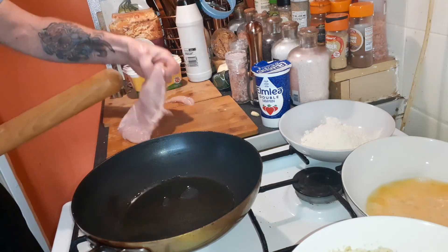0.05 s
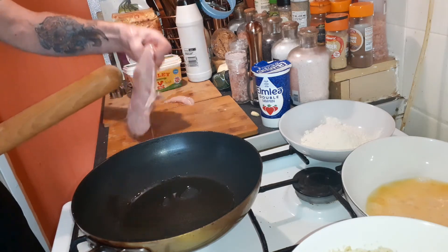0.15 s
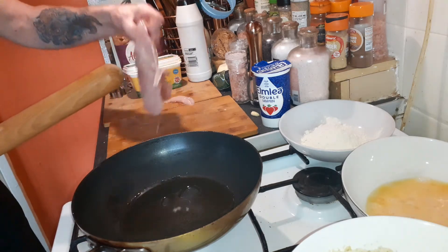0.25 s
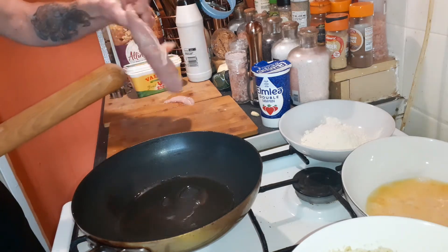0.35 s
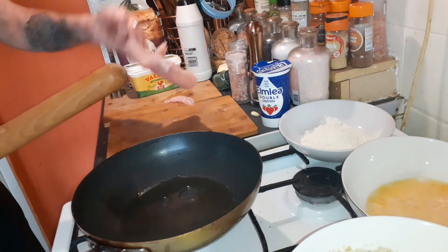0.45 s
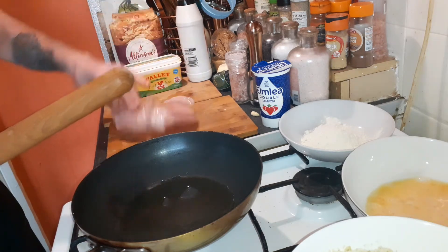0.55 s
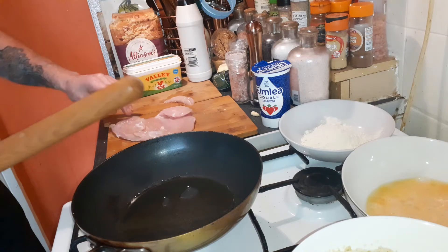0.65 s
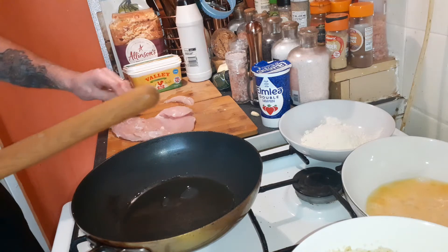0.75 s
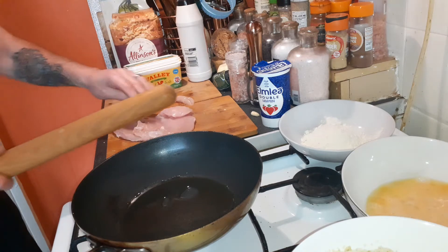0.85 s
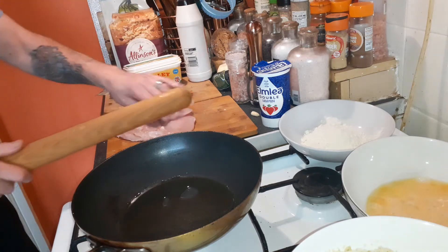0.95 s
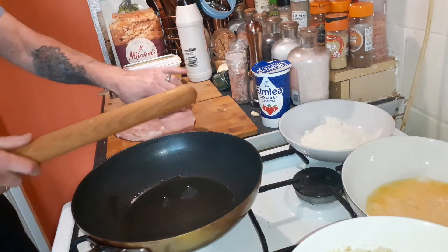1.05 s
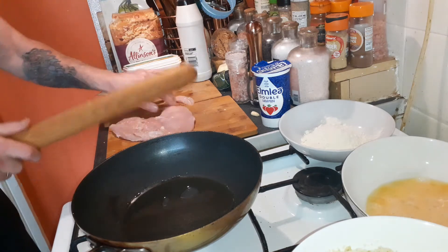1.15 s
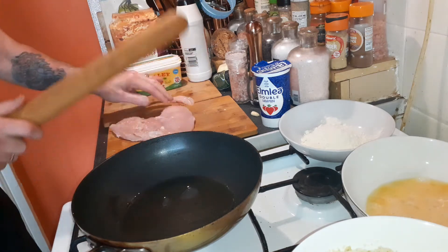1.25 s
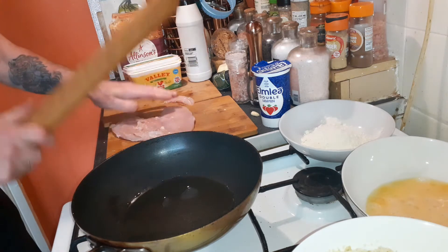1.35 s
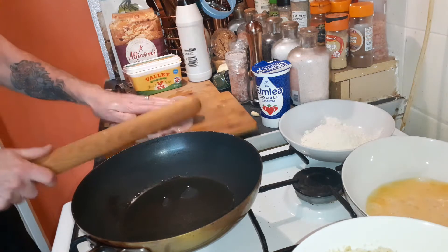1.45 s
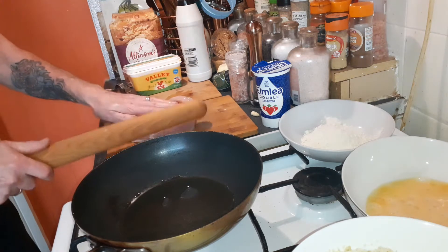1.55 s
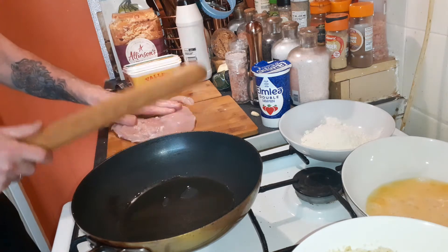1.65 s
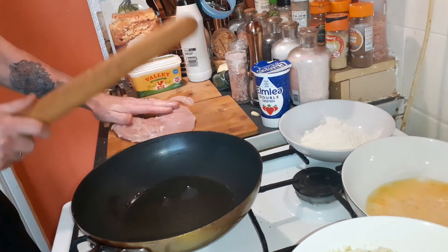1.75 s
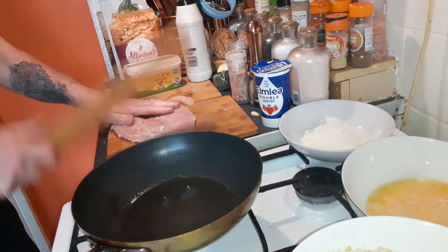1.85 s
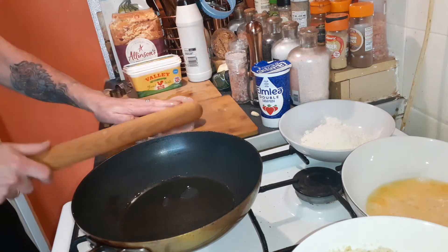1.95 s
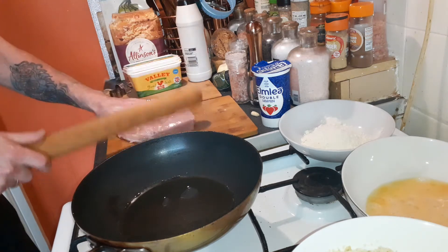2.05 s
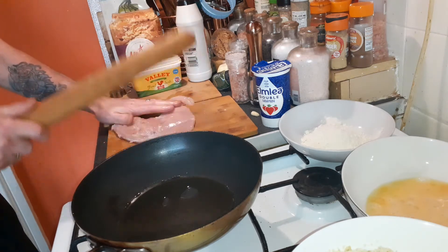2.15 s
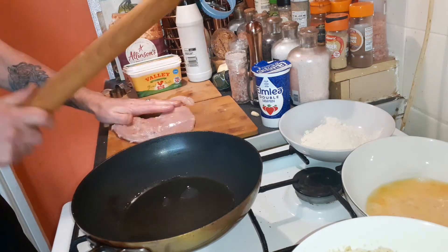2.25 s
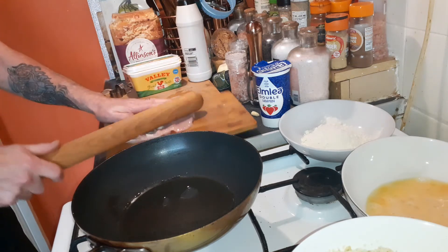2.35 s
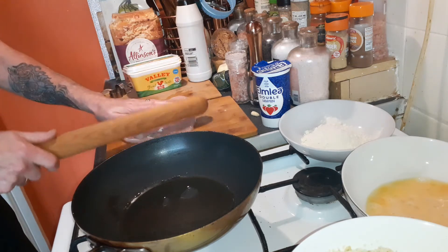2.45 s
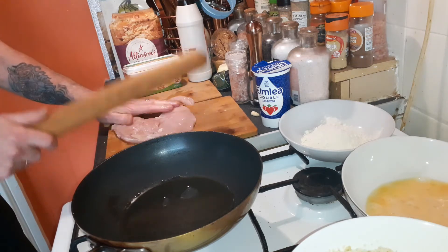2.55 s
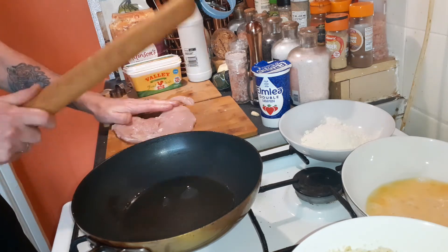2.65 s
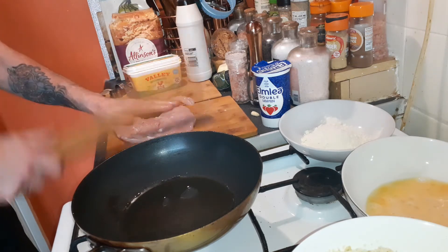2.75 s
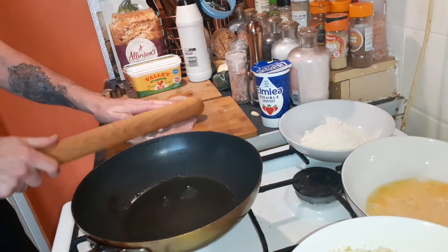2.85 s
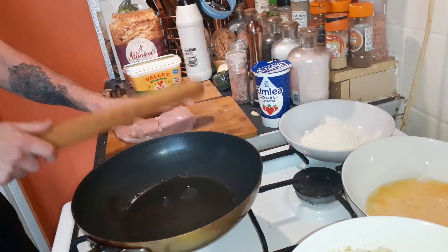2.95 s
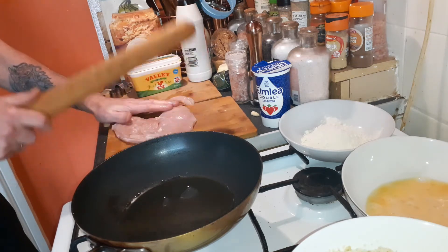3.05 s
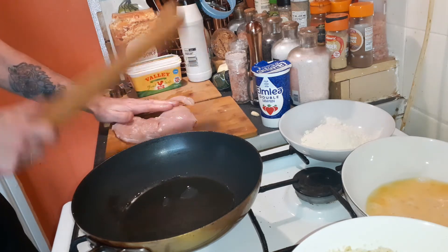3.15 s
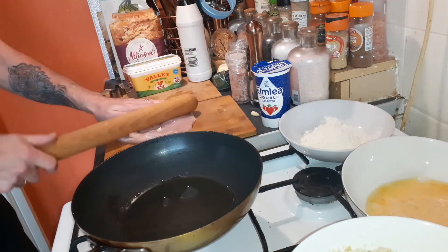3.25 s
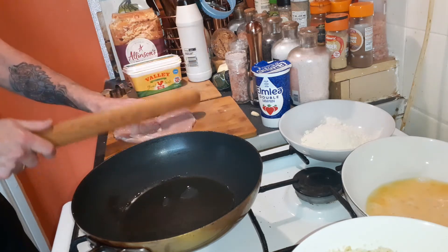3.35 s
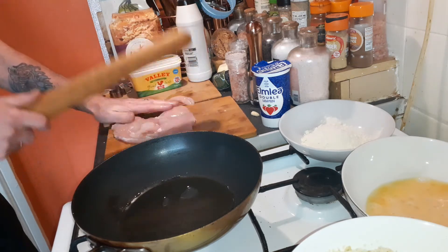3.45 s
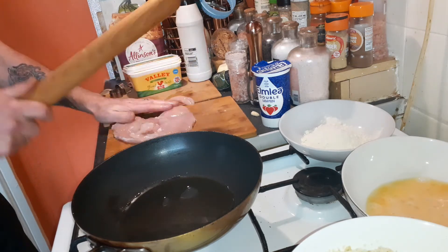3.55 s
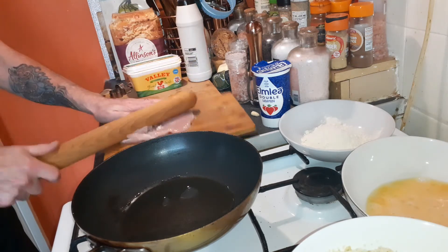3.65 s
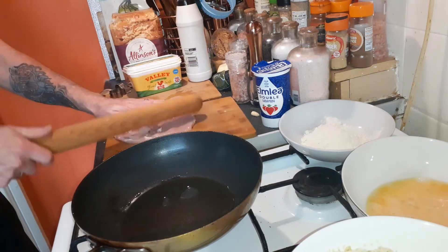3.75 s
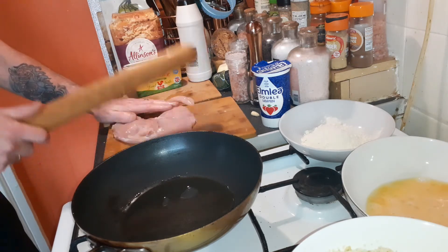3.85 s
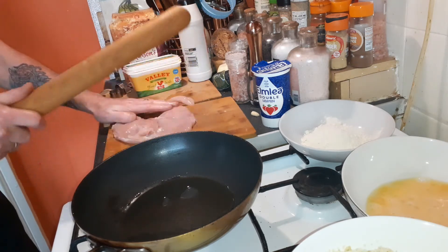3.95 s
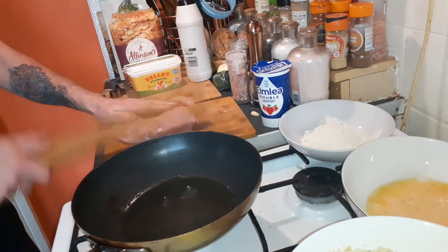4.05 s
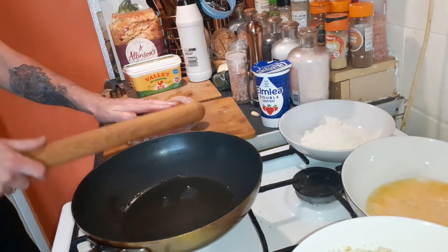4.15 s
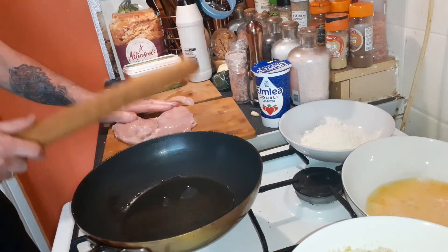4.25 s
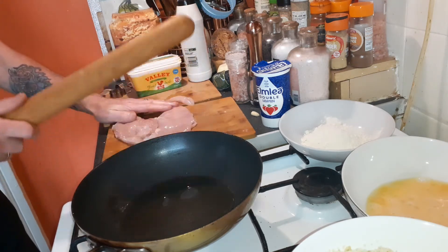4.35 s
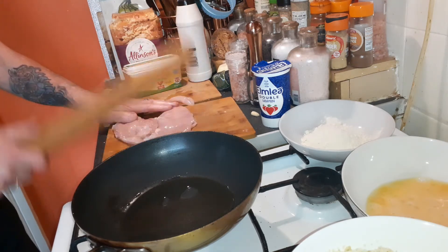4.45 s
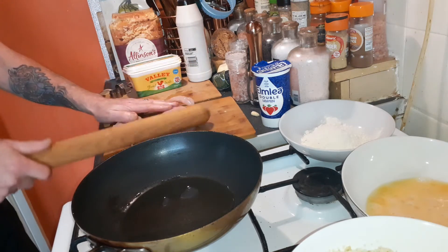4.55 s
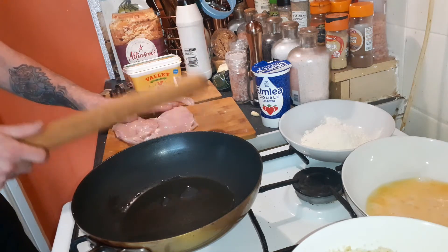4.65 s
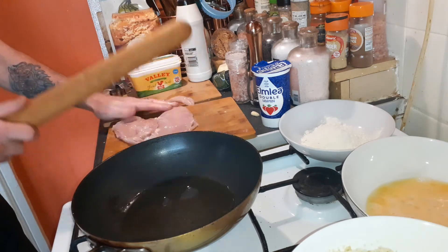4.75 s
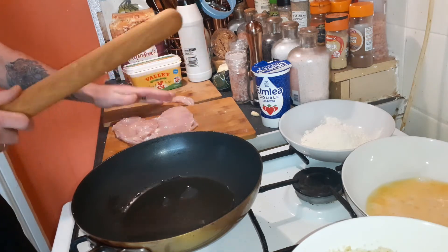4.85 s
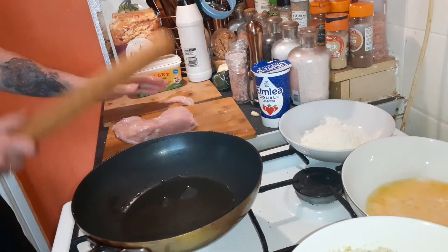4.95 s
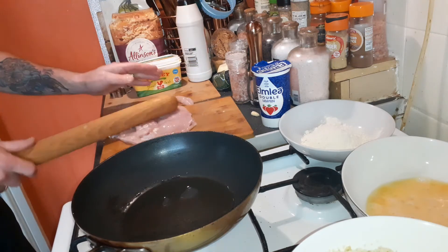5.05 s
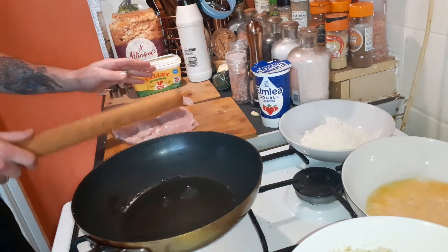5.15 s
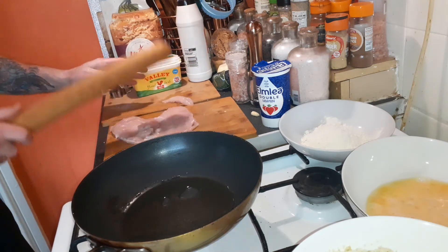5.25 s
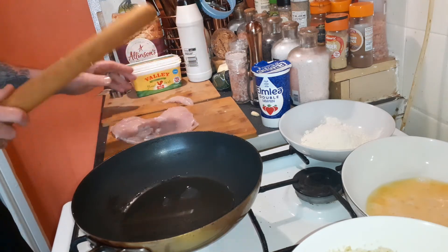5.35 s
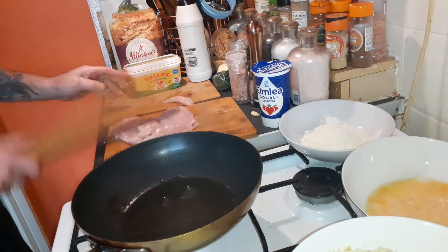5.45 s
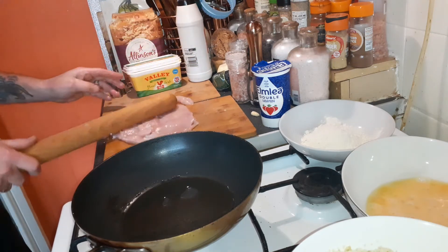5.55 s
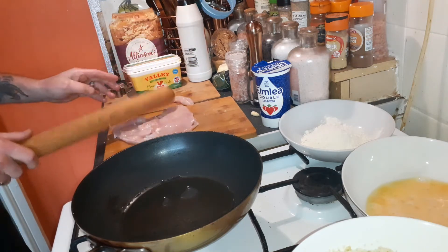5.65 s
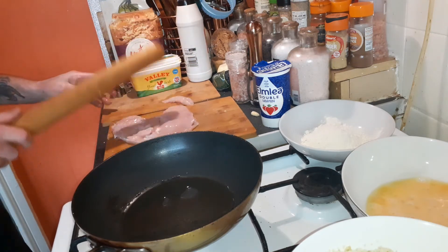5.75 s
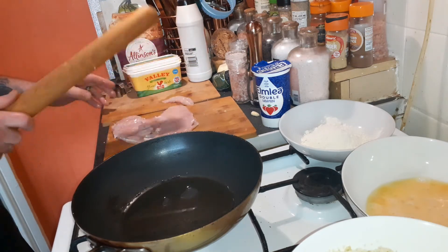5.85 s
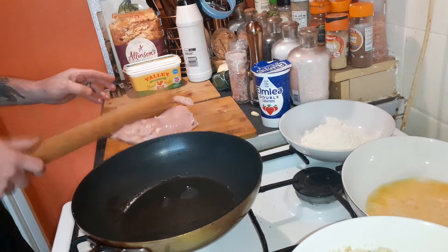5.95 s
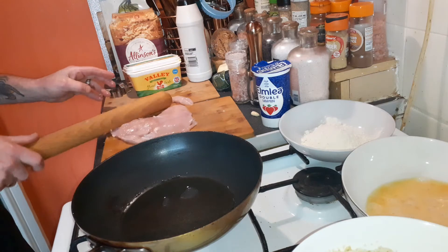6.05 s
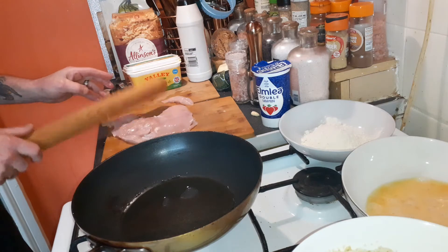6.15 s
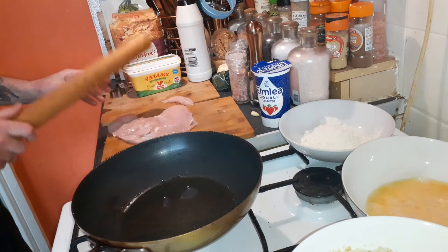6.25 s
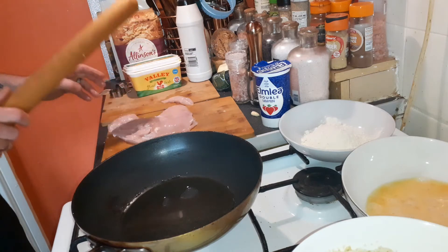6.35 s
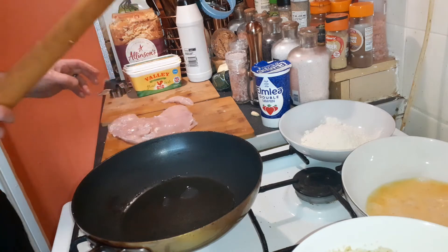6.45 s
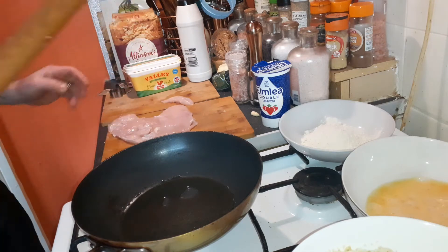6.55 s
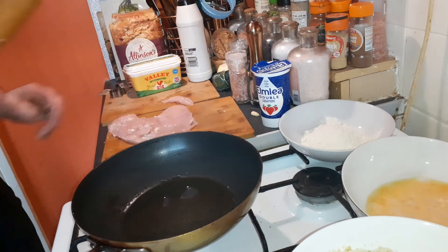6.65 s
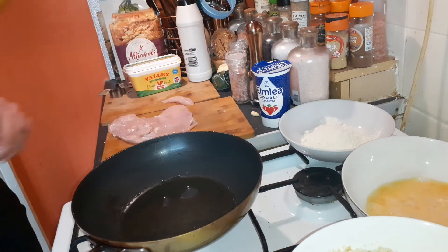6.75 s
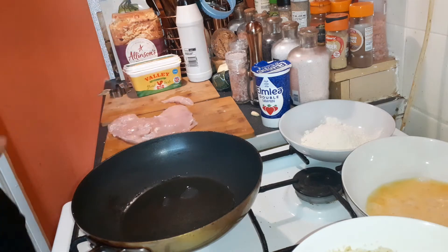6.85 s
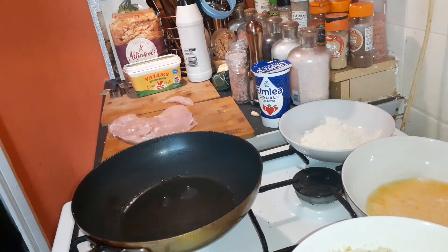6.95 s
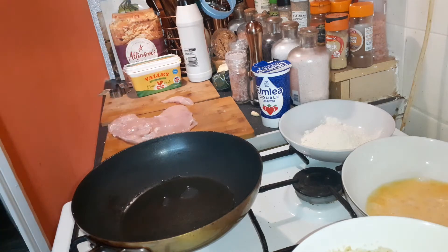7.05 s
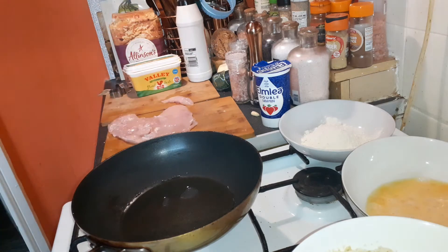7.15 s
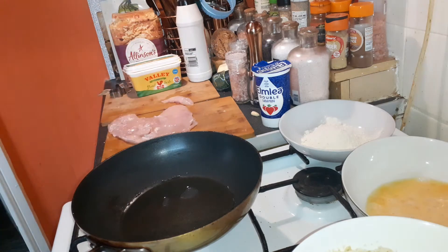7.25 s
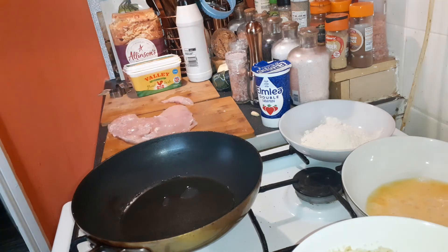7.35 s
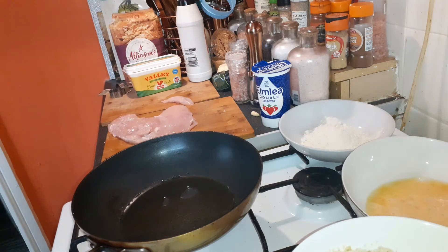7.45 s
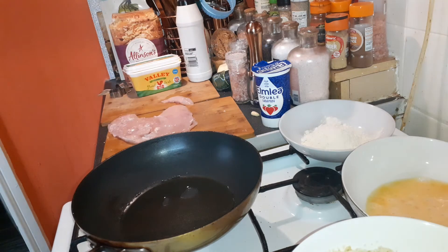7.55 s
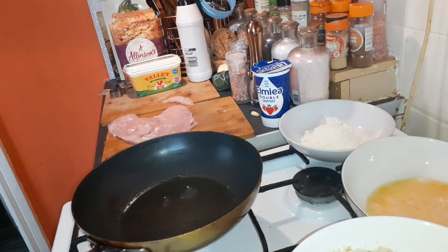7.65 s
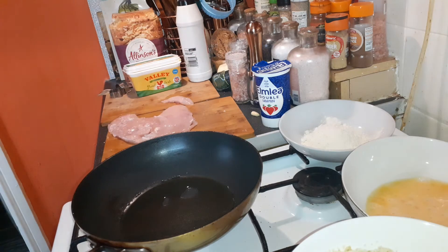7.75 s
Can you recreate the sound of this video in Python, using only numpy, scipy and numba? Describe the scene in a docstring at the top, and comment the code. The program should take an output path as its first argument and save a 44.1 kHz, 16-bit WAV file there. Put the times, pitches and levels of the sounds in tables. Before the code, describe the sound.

A chicken breast flops onto a wooden board, then a rolling pin pounds it eleven times with wet slaps, thuds and clatter.

```python
"""In a small, hard-walled kitchen, a chicken breast flops onto a wooden chopping board.
A rolling pin pounds it eleven times. Each blow squeezes out a wet slap and sends a thud through
board and worktop; the board hops and clatters back down. The cook shuffles softly, the room echoes,
an appliance hums under a faint hiss, and a phone's limiter flattens the loudest blows."""
import sys
import numpy as np
from scipy import signal
from scipy.fft import rfft, irfft
from scipy.io import wavfile
from numba import njit

SR = 44100
rng = np.random.default_rng(int(sys.argv[2]) if len(sys.argv) > 2 else 0)


def log_audio(samples):
    """Write samples as a 16-bit WAV file to the path given in sys.argv[1]."""
    # one column per channel
    frames = np.atleast_2d(samples).T
    # limit to full scale, then quantise
    limited = np.clip(frames, -1, 1)
    pcm = np.round(limited * 32767).astype(np.int16)
    wavfile.write(sys.argv[1], SR, pcm)


N = 343715
T = np.arange(N) / SR
SHORT_T = T[:int(SR * .6)]  # time axis for one short sound

# Levels in the tables are relative: the functions add their own gains.
# blows of the pin: t/s, force/dB, board ring on top of the force/dB, squash time/s,
# treble cutoff/Hz, board's time in the air/s, landing level/dB, rocking time/s
BLOWS = [(1.452, -8, 1.5, .0052, 9000, 0.057, -20.5, .016),
         (1.913, -5.5, 2, 0.0045, 10000, 0.051, -23.5, 0),
         (2.363, -5.5, -2.5, 0.0023, 14000, 0.055, -10, 0),
         (2.797, -5, -2.5, 0.0056, 13500, 0.051, -9.5, 0),
         (3.223, -5, -3, 0.0067, 13000, 0.052, -15, 0.00045),
         (3.665, -5, -8.5, 0.007, 13000, 0.063, -13, 0.001),
         (4.093, -8.5, -3, .007, 14000, 0.052, -11.5, 0.0025),
         (4.517, -7.5, -4.5, .006, 10000, .0535, -13.5, 0.0015),
         (5.023, -11.5, -9.5, 0.0047, 11500, 0.054, -14, 0.0069),
         (5.491, -5, 1.5, 0.0087, 7500, 0.077, -15.5, 0.039),
         (5.982, -7, -12, 0.0067, 5500, 0.044, -15.5, 0.018)]
# tone of the pin's dull knock: f/Hz, level/dB
KNOCK_TONE = [(100, -15.5), (250, 1), (400, 2.5), (900, -0.5), (1400, 0.5), (2000, -19), (4000, -25.5),
              (12000, -35.5)]
# tone of the wet slap: f/Hz, level/dB
SLAP_TONE = [(300, -11), (1000, -7), (2000, -1), (3900, -1), (4800, -5), (8900, -6.5), (10000, -13),
             (12500, -11), (16000, -11)]
# tone of the board landing: f/Hz, level/dB
CLACK_TONE = [(100, -8.5), (300, -10), (800, -2), (1300, -4.5), (2000, -6.5), (3800, -10), (6000, -14.5),
              (8900, -17.5), (10000, -24), (12500, -23.5), (16000, -33.5)]
# notes that board, worktop and cupboard ring at: f/Hz, level/dB, time to fade 60 dB/s, left minus right/dB
WOOD_NOTES = [(75, -19, .33, -3), (102, -11, .22, -5), (130, -15, .45, -3), (157, -12, .16, -4),
              (186, -6, .33, -5), (203, -13, .26, -6), (278, -4, .21, -2), (329, 1, .18, -5),
              (358, -3, .15, -4), (394, -6, .22, -1), (450, -9, .1, 0), (565, -8, .12, 2),
              (591, -3, .19, -7), (696, -4, .19, 3), (762, -7, .17, 1), (841, 1, .18, 3), (864, -2, .2, -7),
              (980, -6, .16, -5), (1033, -6, .2, 0), (1121, -6, .15, -2), (1223, -3, .2, 0),
              (1495, -11, .18, 0), (1666, -10, .2, 0), (2384, -10, .17, 0)]
# the cook's soft movements: t/s, level/dB, rise time/s, scuff compared with bump/dB
COOK_MOVES = [(1.097, -48, 0.0061, -6.5), (6.521, -57.5, .02, 6.5), (6.995, -63, 0.051, -21.5),
              (7.629, -52, .011, -6.5), (7.674, -57, 0.023, 6)]
# how long the kitchen echoes: f/Hz, time to fade 60 dB/s
ECHO_TIMES = [(100, 0.31), (400, 0.31), (1100, 0.28), (3000, 0.27), (8000, 0.26), (16000, 0.24)]
# tones of the mains hum: f/Hz, level/dB
HUM_TONES = [(50, -17.5), (100, -4), (150, -14), (200, -21.5)]
# tone of the broad hiss: f/Hz, level/dB
HISS_TONE = [(25, -23), (70, -12), (170, -14.5), (330, -12.5), (700, -18), (1300, -18.5), (2300, -37.5),
             (3900, -27), (5600, -29), (8900, -26.5), (12000, -20), (16000, -25)]
# narrow bands that stand out of the hiss: f/Hz, width/Hz, level/dB
HISS_PEAKS = [(1189, 9.8, -11), (1345, 150, -8.5), (3060, 62, -17), (3980, 67, -12), (4610, 430, -10),
              (6380, 180, -14), (8970, 100, -10)]
# loudness of hum and hiss together: t/s, level/dB
BACKGROUND_LEVEL = [(0.0, -68), (0.54, -68.5), (0.78, -62.5), (1.52, -60.5), (1.65, -67), (5.21, -68),
                    (6.99, -67.5), (7.79, -62)]

USUAL_SQUASH_S = .007  # a longer squash than this makes more slap, a shorter one less


def pounding(lead_s=.002, sink_s=.0023, bend_s=.00036, thud_s=.001):
    """Each hit squeezes juice and air from the meat, then loads the board. Gives (sound, force)."""
    knock, slap, bend, thud = np.zeros((4, N))
    for s, db, ring_db, squash_s, top_hz, wet_db in meat_contacts():
        squash = (SHORT_T / squash_s) ** 2 * np.exp(-2.6 * SHORT_T / squash_s)
        spray_gain = gain(db - 14 + wet_db) * np.sqrt(squash_s / USUAL_SQUASH_S)
        add(slap, s - lead_s, spray_gain * soften(crackle(squash, spread_db=11.5), top_hz))
        add(knock, s + sink_s, gain([db]))
        add(bend, s + sink_s, gain(db + ring_db) * push(bend_s))  # the quick part bends the board
        add(thud, s + sink_s, gain(db + 3.5) * push(thud_s))  # the slow part shakes the worktop
    sound = gain(34) * shape_tone(knock, KNOCK_TONE) + gain(43) * shape_tone(slap, SLAP_TONE)
    return sound, band(bend, 310, 1500) + thud


def meat_contacts(flop_s=.6083, flop_db=-23):
    """The breast flops down (tip, body, then the rest slumps), and the pin's blows follow."""
    # t/s, force/dB, board ring/dB, squash time/s, treble cutoff/Hz, extra wetness/dB
    tip = (flop_s - .016, flop_db - 18, 4, .011, 13000, 6.5)
    body = (flop_s, flop_db, 4, .0034, 13000, 6.5)
    slump = (flop_s + .032, flop_db - 16.5, 14.5, USUAL_SQUASH_S, 13000, 6.5)
    return [tip, body, slump] + [(*blow[:5], 0) for blow in BLOWS]


def clatter(contact_s=.00008, ticks_per_s=800, chatter_s=.032):
    """Bare wood lands with a crack, and loose things chatter to rest. Gives (sound, force)."""
    cracks, chatter = np.zeros((2, N))
    for s, crack_db, chatter_db, top_hz in board_touches():
        touches = rng.random(len(SHORT_T)) < ticks_per_s / SR
        ticks = crackle(touches * np.exp(-(SHORT_T / chatter_s) ** 2), spread_db=-1)
        add(chatter, s, gain(chatter_db) * soften(ticks, top_hz))
        add(cracks, s, gain(crack_db) * soften(signal.unit_impulse(len(SHORT_T)), top_hz))
    load = cracks + gain(-3) * chatter  # the chatter carries little weight
    force = band(convolve(load, push(contact_s))[0], 450, 4100)  # a light, hard touch favours high notes
    return gain(41) * shape_tone(cracks + chatter, CLACK_TONE), gain(-1) * force


def board_touches(flat_s=.003):
    """The board comes down after each hop. Gives rows of t/s, crack/dB, chatter/dB, treble cutoff/Hz."""
    for s, *_, top_hz, air_s, landing_db, rock_s in BLOWS:
        down_s, crack_hz = s + air_s, .96 * top_hz
        chatter_db = -15.5 + .18 * landing_db  # nearly as loud for a soft landing as for a hard one
        yield down_s, landing_db, chatter_db, crack_hz
        if rock_s > flat_s:  # crooked: one edge touches early, and a dull knock follows the landing
            yield down_s - rock_s, landing_db - 8.5, chatter_db - 3, crack_hz
            yield down_s + 2.5 * rock_s, landing_db - 9, chatter_db - 16.5, 2800


def wood_ring(build_s=.00075):
    """One tap sets board, worktop and cupboard ringing with many fading notes that start together."""
    ring = 0
    for k, (hz, db, fade_s, pan_db) in enumerate(WOOD_NOTES):
        # higher notes reach left and right further out of step
        phase_shift = (-1) ** (k // 2) * .69 * np.sqrt(min(hz / 600, 2)) * np.array([[1], [-1]])
        wave = np.sin(2 * np.pi * hz * SHORT_T + phase_shift)
        ring = ring + gain(db) * pan(pan_db) * wave * np.exp(-np.log(1000) * SHORT_T / fade_s)
    return ring * (1 - np.exp(-SHORT_T / build_s))


def shuffles():
    """The cook's small movements: each is a dull bump with a scuff on top."""
    track = np.zeros(N)
    for s, db, rise_s, scuff_db in COOK_MOVES:
        bump, scuff = rng.standard_normal((2, len(SHORT_T)))
        noise = unit(band(bump, 170, 650)) + gain(scuff_db) * unit(band(scuff, 800, 5200, order=1))
        add(track, s, gain(db) * noise * SHORT_T / rise_s * np.exp(1 - SHORT_T / rise_s))
    return track


def kitchen_echo(direct_db=-20, early_db=2, early_s=.0019, alike_hz=640):
    """The room's answer to a click: direct sound, quick echoes off tiles and jars, then a fading tail."""
    echo = np.zeros((2, len(SHORT_T)))
    early = gain(early_db) * np.exp(-SHORT_T / early_s)
    for hz in 70 * 2 ** (np.arange(17) / 2):  # half-octave bands
        middle, side = band(rng.standard_normal((2, len(SHORT_T))), hz / 2 ** .25, hz * 2 ** .25, order=3)
        # the bass is alike on the left and right
        noise = middle + side * np.array([[1], [-1]]) / np.sqrt(1 + (alike_hz / hz) ** 4)
        late = np.exp(-np.log(1000) * SHORT_T / lookup(ECHO_TIMES, hz))
        tail = noise * (late + early)
        band_energy = hz / np.sqrt(2) / SR
        echo += tail * np.sqrt(band_energy / np.sum(tail ** 2, axis=1, keepdims=True))
    echo[:, 0] += gain(direct_db)
    return echo * pan(-1.74)


def in_kitchen(x):
    """Arm and pin shift between blows, so each blow gets its own pattern of echoes."""
    out = np.zeros((2, N))
    edges = [0] + [int((blow[0] - .05) * SR) for blow in BLOWS] + [N]
    for start, end in zip(edges, edges[1:]):
        for track, echo in zip(out, convolve(x[:, start:end], kitchen_echo())):
            add(track, start / SR, echo)
    return out


def hum_and_hiss(waver_db=1, flicker_db=2):
    """An appliance's wavering mains hum and a hiss with flickering bands swell and sink together."""
    hiss = gain(3) * unit(shape_tone(rng.standard_normal((2, N)), HISS_TONE))
    for hz, width, db in HISS_PEAKS:
        noise = unit(band(rng.standard_normal((2, N)), hz - width / 2, hz + width / 2, order=1))
        hiss += gain(db + 5 + flicker_db * drift(per_s=4.9)) * noise
    hum = sum(gain(db) * unit(np.sin(2 * np.pi * (hz * T + rng.random()))) for hz, db in HUM_TONES)
    hum = hum * gain(4 + waver_db * drift(per_s=5)) * pan(-8.5)
    level_db = np.interp(T, *np.transpose(BACKGROUND_LEVEL))
    return (hiss + hum) * gain(level_db)


def push(rise_s):
    """A smooth push that peaks after rise_s and adds up to one."""
    force = SHORT_T * np.exp(-SHORT_T / rise_s)
    return force / force.sum()


def crackle(outline, spread_db):
    """Clicks of uneven size that follow a loudness outline, with a total energy of one."""
    x = rng.standard_normal(len(SHORT_T)) * gain(spread_db * rng.standard_normal(len(SHORT_T))) * outline
    return x / np.sqrt(np.sum(x ** 2))


def drift(per_s):
    """A slow random wander, roughly between -1 and 1."""
    steps = rng.standard_normal(400)
    return np.interp(T * per_s, np.arange(len(steps)), steps)


def gain(db):
    """Turn decibels into a number to multiply by."""
    return 10 ** (np.asarray(db) / 20)


def unit(x):
    """Scale a sound to an average (rms) level of one."""
    return x / np.sqrt(np.mean(x ** 2))


def pan(db):
    """Left and right gains, with the left louder by db."""
    return gain(np.array([[db], [-db]]) / 2)


def add(track, s, x):
    """Mix a short sound into a track at time s."""
    i = int(s * SR)
    track[i:i + len(x)] += x[:N - i]


def lookup(points, hz):
    """Read between a table's rows, with frequency spaced in octaves."""
    f, value = np.transpose(points)
    return np.interp(np.log(np.maximum(hz, 1)), np.log(f), value)


def convolve(x, response):
    """Let every sample of a sound set off its own copy of a response."""
    return signal.oaconvolve(np.atleast_2d(x), np.atleast_2d(response), axes=1)[:, :N]


def shape_tone(x, points, size=4096):
    """Filter a sound by a table of f/Hz, level/dB."""
    curve_db = lookup(points, np.arange(size // 2 + 1) * SR / size)
    cepstrum = irfft(curve_db * np.log(10) / 20)
    cepstrum[1:size // 2] *= 2  # folded so that the filter rings only after a click, never before
    cepstrum[size // 2 + 1:] = 0
    return convolve(x, irfft(np.exp(rfft(cepstrum))))


def band(x, lo_hz, hi_hz, order=2):
    """Keep the part of a sound between two frequencies."""
    edges_hz = [lo_hz, min(hi_hz, SR / 2 - 100)]
    return signal.sosfilt(signal.butter(order, edges_hz, "band", fs=SR, output="sos"), x)


def soften(x, top_hz):
    """Gently turn down the treble above top_hz."""
    return signal.sosfilt(signal.butter(1, min(top_hz, .45 * SR), fs=SR, output="sos"), x)


@njit
def follow(x, attack, release):
    """Track a level, rising at the attack rate and falling at the release rate."""
    out, level = np.empty(len(x)), 0.
    for i in range(len(x)):
        level += (x[i] - level) * (attack if x[i] > level else release)
        out[i] = level
    return out


def scene(directions=3):
    """Slaps and clatter fill the kitchen while their forces make the wood ring."""
    air, movement = 0, shuffles()
    for _ in range(directions):  # spray and chatter send a different pattern towards each wall
        slaps, blow_force = pounding()
        clacks, landing_force = clatter()
        air = air + in_kitchen(slaps + clacks + movement) / np.sqrt(directions)
    wood = convolve(blow_force + landing_force, wood_ring())
    wood = band(wood, 120, 8500, order=4)  # the wood's ringing is kept out of the deep bass
    return air + wood + hum_and_hiss()


def record(dry, limit_db=-3, attack_s=.0003, release_s=.05, top_hz=15800):
    """The phone's limiter holds the blows down, rounds what slips through and cuts the highest treble."""
    level = follow(np.abs(dry).max(axis=0), 1 / (attack_s * SR), 1 / (release_s * SR))
    held = dry / np.maximum(level / gain(limit_db), 1)
    rounded = held / (1 + held ** 6) ** (1 / 6)
    return signal.sosfilt(signal.ellip(8, .2, 70, top_hz, fs=SR, output="sos"), rounded)


dry = scene()
out = record(dry)
log_audio(out)
```